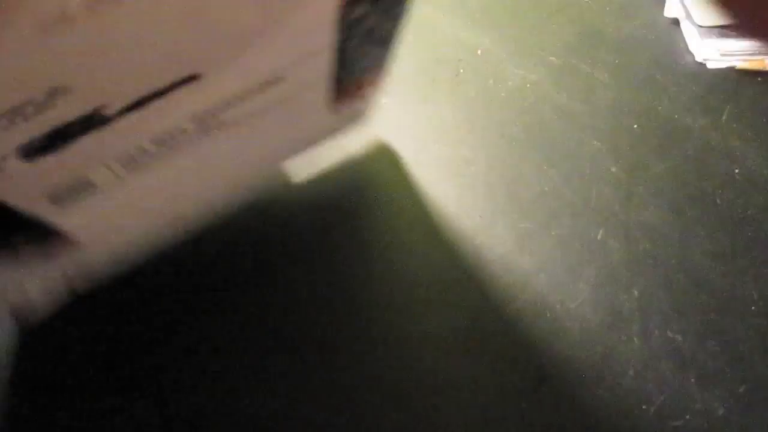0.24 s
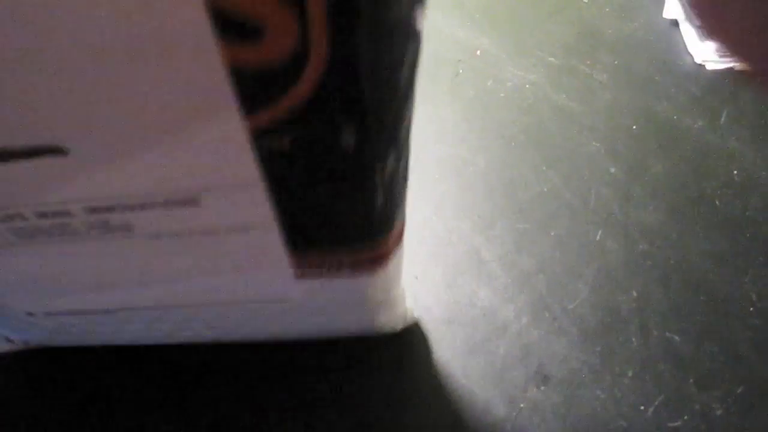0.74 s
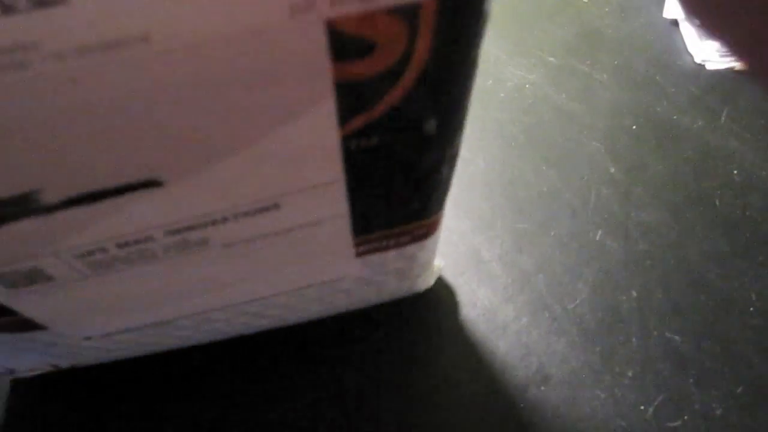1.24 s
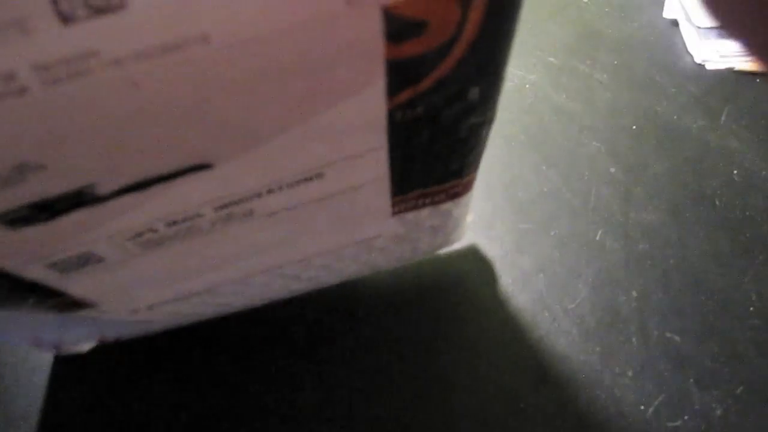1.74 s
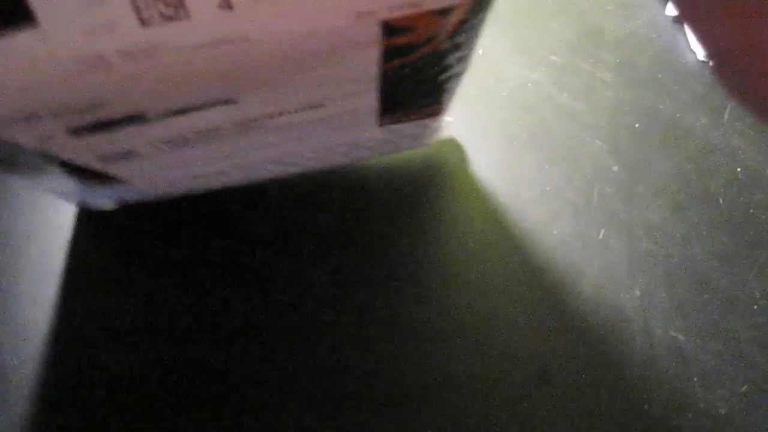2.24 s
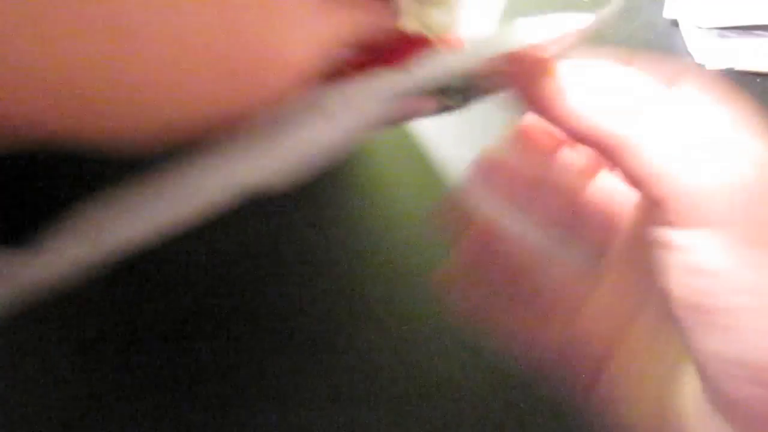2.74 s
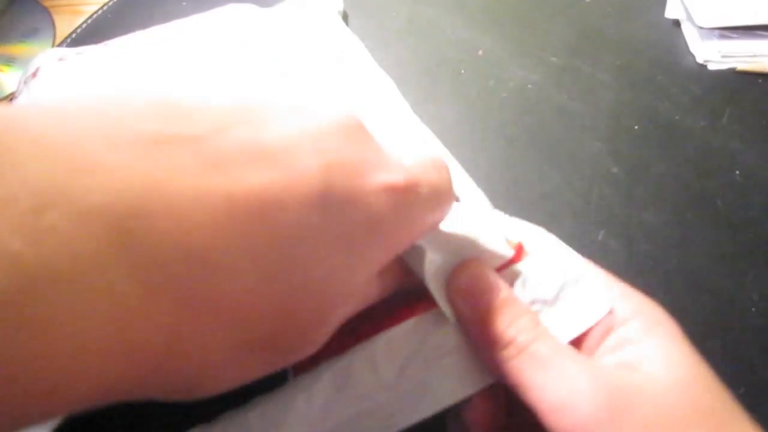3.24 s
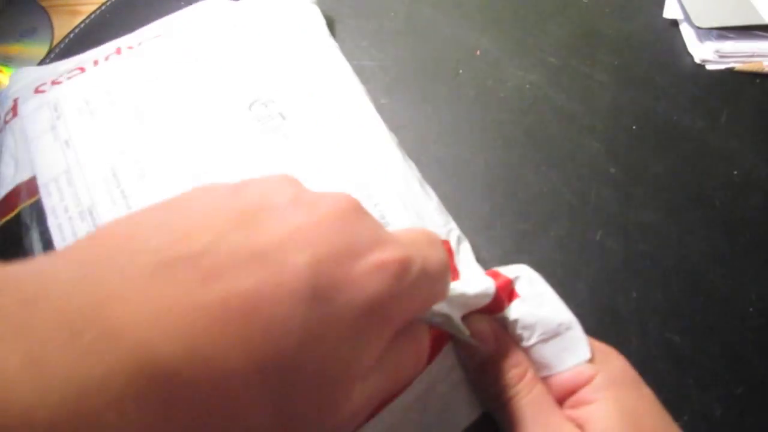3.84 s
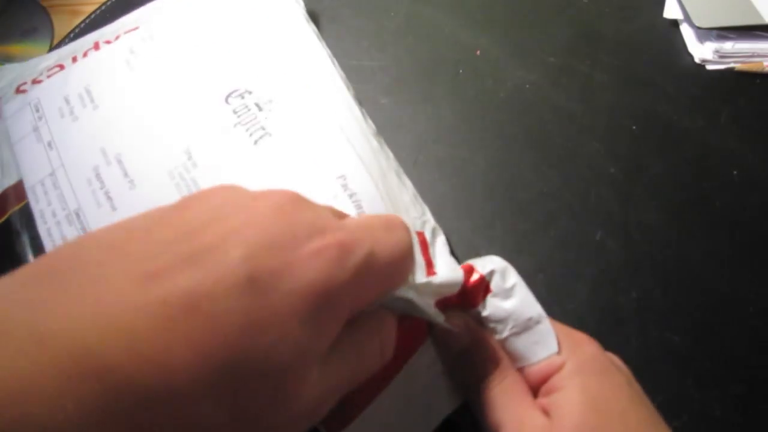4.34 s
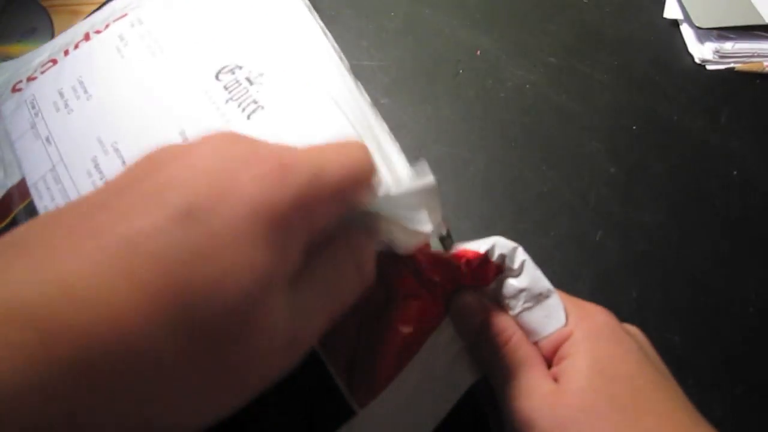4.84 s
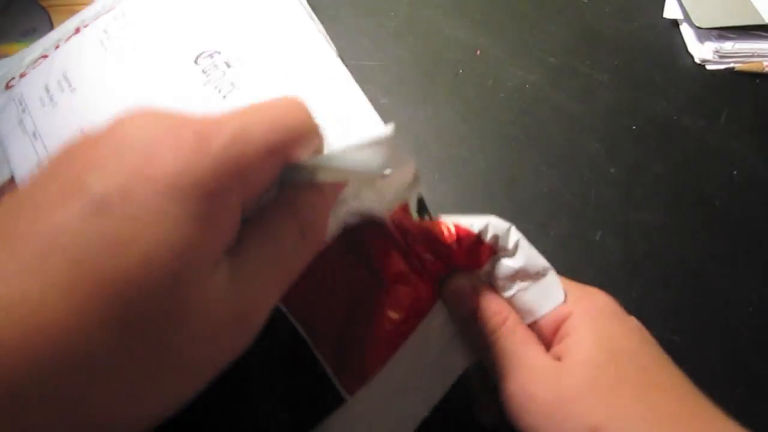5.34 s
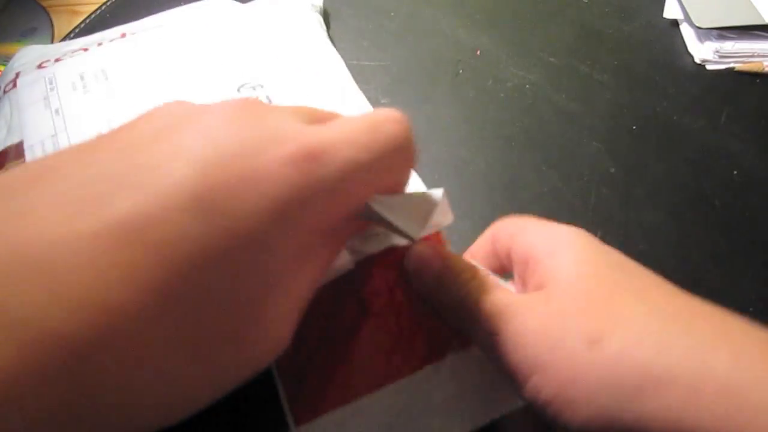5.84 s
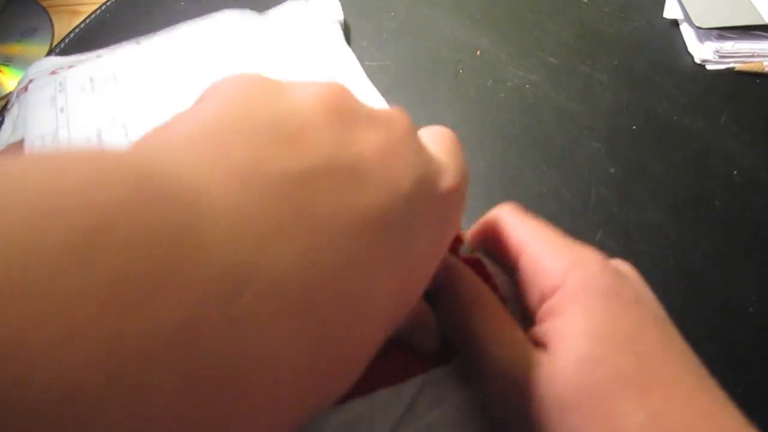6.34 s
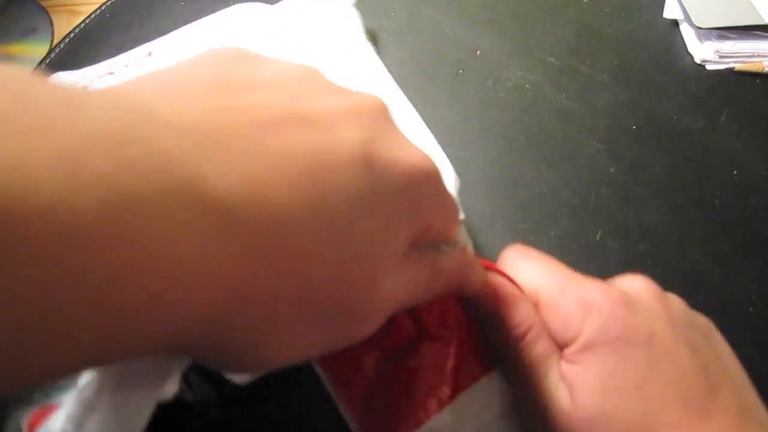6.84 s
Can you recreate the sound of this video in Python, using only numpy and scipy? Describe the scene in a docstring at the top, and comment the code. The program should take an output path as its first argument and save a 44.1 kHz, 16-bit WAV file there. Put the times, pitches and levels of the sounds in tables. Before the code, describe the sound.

Close, dry crackling and rustling of a plastic mailer turned over on a desk, then tugged in short bursts and torn a little.

```python
"""Plastic mailer pulled open by hand

A plastic mailer is picked up from a desk, turned over and pulled open, close up in a small room. Creases snap
as clicked resonances over crinkle (clumped random facet flips) and sliding hiss (coloured noise); taut film
slips in runs of dull plucks and rips in volleys of tiny breaks. Dragged film sings as wavering narrow noise.
Resonances ring the bag faintly, low thumps sit under many of the snaps, and a desk bounce, a short tail and air
noise make the room."""
import sys
import numpy as np
from scipy import signal
from scipy.fft import rfft, irfft
from scipy.io import wavfile
from scipy.ndimage import uniform_filter1d

SR = 44100
rng = np.random.default_rng(int(sys.argv[2]) if len(sys.argv) > 2 else 0)


def inscribe(sig):
    """Save sig as 16-bit PCM at rate SR to the path in sys.argv[1].

    A 1-D sig is mono; a 2-D sig holds one channel per row.
    Samples are clipped to [-1, 1] before scaling.
    """
    pcm = np.round(np.clip(np.atleast_2d(sig).T, -1, 1) * 32767)
    wavfile.write(sys.argv[1], SR, pcm.astype(np.int16))


N = 313551

# Big creases that buckle. Each row: start in seconds, relative level in dB, pitch in Hz, sharpness as Q.
BIG_CREASES = [(0.0955, -21, 3800, 3), (0.1531, -20, 7800, .5), (0.3581, -9, 3300, 1),
               (0.4188, -13, 3500, .5), (0.5156, -13.5, 3500, 1.4), (0.5237, -7, 3500, 4),
               (0.6674, -11, 2600, .7), (0.7092, -10, 3300, 4), (0.7227, -12, 2800, 1.4),
               (0.7327, -15, 600, 1.4), (0.7829, -11, 1100, .5), (0.8155, -15, 2200, 1.4),
               (0.8223, -7, 3500, 1.4), (0.8607, -11, 5800, .5), (0.8881, -13, 5100, .5),
               (0.8963, -11, 3300, .5), (0.9099, -13, 4200, 1), (0.9172, -10, 4000, .7),
               (1.0348, -14, 5400, .7), (1.0667, -14, 1800, 1), (1.121, -12, 7400, .5),
               (1.1373, -13, 3300, 1.4), (1.1723, -12, 2200, .5), (1.1816, -15, 6900, 1.4),
               (1.2384, -12, 2900, 1.4), (1.277, -12, 3500, .7), (1.3068, -15, 7400, .5),
               (1.4344, -16, 7400, .5), (1.4549, -20, 7400, .5), (1.5099, -17, 1600, .5),
               (1.532, -10, 1200, 1), (1.5678, -19, 1800, .7), (1.586, -18, 7400, .5),
               (1.6625, -9, 2300, 1), (1.7265, -18, 6100, 1), (1.7621, -12, 2900, 4),
               (1.8025, -7, 1900, .5), (1.9638, -10, 4200, .7), (1.9712, -9, 2800, 1.4),
               (2.0035, -14, 6100, 1), (2.0136, -15, 3800, 1.4), (2.0373, -15, 3800, .5),
               (2.1672, -17, 5400, .7), (2.2431, -22, 2900, 2), (2.3542, -12, 1000, 1.4),
               (2.4696, -13, 4800, .5), (2.5473, -6, 1600, .5), (2.5516, -12, 4500, 4),
               (2.6368, -13, 1000, 1), (2.7102, -14, 1700, 4), (2.7999, -17, 1700, .7),
               (2.8694, -16, 3500, 2.5), (2.8949, -14, 4500, .7), (2.9235, -14, 2900, 2),
               (3.0347, -11, 5100, 2), (3.0694, -16, 2400, .7), (3.1074, -14, 4500, .5),
               (3.1759, -14, 3000, 2), (3.2463, -14, 3000, 1.4), (3.2641, -17, 2800, 2),
               (3.2981, -17, 2600, 1), (3.3428, -17, 1000, 3), (3.3993, -14, 9400, 4),
               (3.4318, -16, 1200, .5), (3.4418, -16, 900, .5), (3.5781, -17, 3100, 3),
               (3.6763, -19, 2400, 2), (3.7154, -13.5, 1400, .4), (3.7723, -21, 1600, 1),
               (3.8721, -23, 1800, .5), (3.9225, -26, 1500, 1), (4.0492, -25, 1400, 3),
               (4.0544, -25, 7400, 4), (4.1515, -26, 1400, 3), (4.2902, -22, 1700, 1),
               (4.4737, -13, 4000, .7), (4.4976, -18, 1600, .7), (4.5123, -13, 2800, 1),
               (4.6552, -22, 6000, .5), (4.6722, -9, 2600, .5), (4.7079, -16, 2800, .7),
               (4.7498, -12.5, 4000, .7), (4.757, -11, 4200, 3), (4.888, -15, 4500, .5),
               (5.2896, -23, 1300, 1.4), (5.4973, -14, 1600, .7), (5.5447, -18, 2800, .7),
               (5.6699, -21, 1200, 2), (5.788, -24, 1300, 1), (5.8545, -15, 5100, 3),
               (5.8583, -13, 2400, 2), (5.9108, -14, 1500, .5), (5.9763, -14, 5100, .5),
               (6.1953, -18, 2800, .5), (6.2069, -13, 1900, 3), (6.2489, -17, 4200, .7),
               (6.2783, -17, 1000, .5), (6.363, -14, 4800, .5), (6.3863, -16, 800, .5),
               (6.4166, -15, 700, .5), (6.4348, -14, 7800, .5), (6.8427, -21, 1500, .5)]
# Short rips of the film. Each row: start in seconds, length in seconds, relative level in dB, pitch in Hz.
FILM_RIPS = [(1.3608, .002, -14, 3500), (3.029, .008, -22, 4200), (4.9128, .0095, -13.5, 1250),
             (6.8763, .004, -16, 7000), (6.9145, .006, -14.5, 1600), (6.9215, .008, -13, 1200),
             (6.936, .016, -14.5, 1300)]
# Moves of the hands, each a burst of rustle. Each row: start in seconds, length in seconds, relative level at
# mid-move in dB, swell from start to end in dB, body in dB, sheen in dB, sliding hiss in dB (last three: offsets).
HAND_MOVES = [(-0.02, 0.23, -35, 7, -4, -2.5, 9), (0.291, 0.15, -36.5, -23.5, -7, -3.5, -9),
              (0.326, .21, -29.5, 6.5, -6, -1.5, 1.5), (0.558, 0.29, -26, -5, -5, -4.5, 2),
              (0.85, 0.062, -23, -14.5, -4.5, -0.5, 4), (0.97, 0.15, -26.5, 3.5, -5, -2, 3.5),
              (1.156, 0.16, -32.5, -3.5, -2.5, 0, -2.5), (1.366, 0.073, -41, 5, 4, -6, 3),
              (1.466, 0.33, -35, 6, -4.5, 0, -5.5), (1.772, 0.28, -30, 0, -2.5, -6, 6),
              (2.086, 0.052, -30, 2, -6, -4, 5), (2.181, 0.049, -36.5, 3.5, -2.5, -6, 5),
              (2.266, .13, -32.5, 7.5, -11, -5, 9), (2.432, 0.22, -25, 3.5, -4.5, -6, 4),
              (2.659, 0.15, -29, -2, -5, -3, 5.5), (2.836, 0.13, -31.5, 7.5, -2.5, -6, 6),
              (3.004, 0.098, -31, 8.5, -4, -3.5, 9), (3.143, 0.068, -35, 2, -4, 0, 9),
              (3.225, 0.15, -31.5, 4, -2.5, -4.5, 10.5), (3.418, 0.098, -29.5, -2, -3, -4, 6),
              (3.529, 0.28, -36, -3, -3, -3.5, 2), (3.833, 0.16, -42.5, -3, -6, -1.5, 14),
              (4.004, 0.2, -45, -2, -2.5, -2, 8), (4.261, 0.04, -38, -4, -3, -3, 8),
              (4.32, 0.16, -47, -1, -7, 0, 11), (4.446, 0.077, -34, 5, -2.5, -4, 7),
              (4.574, 0.017, -30, -10.5, -4, 0, 8), (4.65, 0.17, -33, 2.5, -4, -1, 10),
              (4.859, 0.15, -30.5, -6, -5.5, -4, 5.5), (5.044, 0.26, -42.5, 0.5, -3, -3.5, 13.5),
              (5.382, 0.16, -36, 12.5, -3, -5, 6), (5.567, 0.024, -36, 1, -5, -3, 21),
              (5.631, 0.069, -37, 7, 1.5, -6.5, 20), (5.794, 0.045, -37.5, 3, 1, -9, 18),
              (5.827, 0.17, -29, -2.5, -2.5, -3.5, 7.5), (6.019, 0.15, -35.5, 8.5, -1, -5.5, 14),
              (6.19, 0.22, -31.5, -9.5, -1.5, -4.5, 13), (6.326, 0.16, -29, 8, 2, -3.5, 19),
              (6.5, 0.11, -31, 5, 2, -5, 16), (6.634, 0.18, -32, -5, 2, -7, 4),
              (6.856, 0.069, -33, 3, 7, 2, 0), (6.911, 0.15, -29, -2.5, -2.5, -5.5, 14)]
# Runs of jerks of the taut film. Each row: start in seconds, length in seconds, first gap in seconds, share by
# which each gap shrinks, first relative level in dB, change per jerk in dB, bite of the upper modes in dB,
# low-pass edge in Hz.
JERK_RUNS = [(1.2929, .07, .0082, 0, -14, -.5, 2, 4200), (1.377, .052, .0053, 0, -35, .4, -12, 1400),
             (6.5025, .102, .0119, 0, -16, .5, -9, 2300), (6.6483, .07, .018, .06, -19.5, 0, -6, 2600),
             (6.7304, .081, .0121, .09, -8, -.8, -13, 2200)]
# Modes of the taut film. Each row: frequency in Hz, relative level in dB, t60 in seconds.
TAUT_FILM_MODES = [(738, -16, .035), (890, -3, .008), (1220, -5, .009), (1600, -7, .006), (2150, -3, .005),
                   (3300, -3, .004)]
# Path of the panel that sings as the bag drags over desk and fingers.
# Each row: time in seconds, relative level in dB, pitch in Hz.
DRAG_PATH = [(2.272, -34, 990), (2.293, -33, 1068), (2.381, -36, 847), (2.429, -69, 1300),
             (2.456, -31, 1500), (2.519, -28.5, 1006), (2.562, -33, 900), (2.636, -30, 899),
             (2.694, -37, 1087), (2.712, -27, 1690), (2.735, -65, 1794)]
# Air and panels of the bag. Each row: frequency in Hz, Q, gain in dB.
BAG_RESONANCES = [(421, 26, -4), (521, 20, -7), (640, 32, -3), (736, 28, -9), (1376, 35, -10)]
# Low thumps, mostly the bass under crease snaps at the same moments. Each row: start in seconds, relative level
# in dB, pitch in Hz, sharpness as Q.
LOW_THUMPS = [(0.153, -20.5, 470, 5.4), (0.197, -15.5, 224, 3), (0.358, -16, 216, 0.55),
              (0.419, -22, 149, 0.75), (0.523, -18, 193, .5), (0.822, -10, 248, 0.14), (1.121, -25, 180, .7),
              (1.293, -16, 250, 1.2), (1.662, -15, 220, 0.17), (2.354, -17.5, 202, 1.1),
              (2.547, -16.5, 170, 0.65), (2.648, -17.5, 229, 4.2), (4.672, -20, 300, 1),
              (4.708, -20, 460, 4.9), (4.913, -26, 248, 0.25), (5.545, -22, 200, .6),
              (6.922, -14, 285, 0.49)]
# Colour of crinkle, sliding film and room air. Each row: frequency in Hz, relative level in dB.
CRINKLE_COLOUR = [(60, -5), (150, 17), (240, 16), (330, 4.5), (500, -6.5), (800, 6), (1250, 10.5),
                  (1800, -8), (3200, 9.5), (5500, 5.5), (8000, 8), (12000, 4), (16000, 6)]
SLIDE_COLOUR = [(60, -16), (150, -22), (300, -6), (500, -5.5), (800, -1.5), (1300, 1.5), (1800, 1),
                (3200, -1), (5500, -2.5), (8000, -8), (12000, -12.5), (16000, -24.5)]
AIR_COLOUR = [(25, -5.5), (70, -5), (150, -7.5), (400, -13), (1500, -10.5), (16000, -70)]

THIN_FILM_HZ, CUTOFF_HZ = 233, 15900
BODY_EDGE_HZ, SHEEN_EDGE_HZ = 1600, 6000
MOVE_ATTACK_S, SETTLE_DB_PER_S, HELD_DB = 0.026, 182, -54


def snaps(table, level_db, chatter, chatter_s, settle, settle_s, top_hz):
    """A click, brief chatter and a fainter, longer settling excite one resonance: a fold or bag giving way."""
    size = 1536
    out, t = np.zeros(N + size), np.arange(size) / SR
    decay = chatter * np.exp(-t / chatter_s) + settle * np.exp(-t / settle_s)
    for (start_s, db, hz, q), noise in zip(table, rng.standard_normal((len(table), size))):
        push = (t == 0) + noise * decay
        snap = cut(resonate(push, hz, q), top_hz, "low", order=1)
        at = int(start_s * SR)
        out[at:at + size] += from_db(db + level_db) * snap / np.linalg.norm(snap)
    return out[:N]


def small_creases(hands, count, over_db, spread_db, pitch_hz, octaves_per_db, octaves, q):
    """Lesser creases, one per equal time slot; level and pitch follow the handling. Rows as in BIG_CREASES."""
    start_s = (np.arange(count) + rng.random(count)) / count * N / SR
    size, pitch, sharpness = rng.standard_normal((count, 3)).clip(-2, 2).T
    hand_db = np.interp(start_s, hands[:, 0], hands[:, 1])
    hz = pitch_hz * 2 ** (octaves * pitch + octaves_per_db * (hand_db - hand_db.mean()))
    return np.column_stack([start_s, hand_db + over_db + spread_db * size, hz, q * 2 ** sharpness])


def rips(level_db, per_s, fizz, q):
    """A tear runs through the film as a tight volley of tiny breaks over a faint fizz."""
    out = np.zeros(N)
    for start_s, length_s, db, hz in FILM_RIPS:
        at, size = int(start_s * SR), int(length_s * SR)
        noise = rng.standard_normal(SR // 10)
        broken = rng.random(SR // 10) < per_s / SR
        breaks = noise * (fizz + broken)
        out[at:at + size] += from_db(db + level_db) * rms_one(resonate(breaks[:size], hz, q))
    return out


def rustle(hands, slide_db, flutter_db, body_db, mid_db, sheen_db):
    """Crinkle and stick-slip hiss: broad loose panels give the body, tight creases the sheen."""
    level_db, body, sheen, sliding_db = in_time(hands)
    hiss = rms_one(colour(rng.standard_normal(N), SLIDE_COLOUR))
    hiss = hiss * from_db(slide_db + sliding_db + flutter_db * drift(133))
    facets = crinkle(level_db, per_s=1300, busier=.4, spread_db=6.5, clump_db=4.5, q=4.2, skirt_q=0.24)
    film = facets + hiss
    low = cut(film, BODY_EDGE_HZ, "low", order=3)
    mid = cut(cut(film, BODY_EDGE_HZ, "high", order=3), SHEEN_EDGE_HZ, "low", order=3)
    high = cut(film, SHEEN_EDGE_HZ, "high", order=3)
    zones = (low, body + body_db), (mid, mid_db), (high, sheen + sheen_db)
    return sum(even(x, window_s=0.069) * from_db(level_db + db) for x, db in zones)


def crinkle(level_db, per_s, busier, spread_db, clump_db, q, skirt_q):
    """Small facets flip in clumps at various pitches, more of them the harder the film is worked."""
    rate = per_s * from_db(busier * (level_db - level_db.mean()) + clump_db * drift(35))
    born = rng.random(N) < rate / SR
    sizes = from_db(spread_db * np.minimum(rng.exponential(1, N), 3.2)) * rng.choice([-1, 1], N)
    pitches_hz = np.geomspace(600, 13000, 22)
    dealt = rng.integers(0, len(pitches_hz), N)
    facets = 0
    for k, hz in enumerate(pitches_hz):
        # a facet radiates only near its own size
        flips = resonate(born * sizes * (dealt == k), hz, skirt_q)
        facets = facets + resonate(flips, hz, q) / np.sqrt(hz)
    return even(colour(facets, CRINKLE_COLOUR), window_s=0.073)


def handling():
    """Each move rises, swells or sags, and settles; the loudest dominates the colour.

    Returns rows of time in seconds, then level, body, sheen and sliding in dB.
    """
    t = np.arange(0, N / SR, .001)
    power, tint = from_db(HELD_DB) ** 2 + 0 * t, 0
    for start_s, length_s, db, swell_db, *colours_db in HAND_MOVES:
        rise = np.clip((t - start_s) / MOVE_ATTACK_S, 0, 1)
        hold_db = db + swell_db * (np.clip((t - start_s) / length_s, 0, 1) - .5)
        settle_db = SETTLE_DB_PER_S * np.maximum(t - start_s - length_s, 0)
        move = (rise * from_db(hold_db - settle_db)) ** 2
        power, tint = power + move, tint + np.outer(colours_db, move)
    return np.column_stack([t, 10 * np.log10(power), *(tint / power)])


def slips(level_db, low_hz, jitter_s, uneven_db, catch_s, catch_db):
    """Each jerk plucks the stretched film like a small slack drum, and catches once more before it rests."""
    out, k = 0, np.arange(16)
    for start_s, length_s, gap_s, shrink, db, step_db, bite_db, soft_hz in JERK_RUNS:
        gaps_s = gap_s * (1 - shrink) ** k
        after_s = np.cumsum(gaps_s) - gaps_s
        late, strong = rng.standard_normal((2, len(k)))
        jerk_s = start_s + after_s + jitter_s * late
        jerk_db = db + step_db * k + uneven_db * strong
        jerks = np.column_stack([jerk_s, jerk_db, np.full(len(k), bite_db)])
        delay_s = catch_s * rng.uniform(0.68, 1.84, len(k))
        catches = jerks + [0, catch_db, 0] + np.outer(delay_s, [1, 0, 0])
        inside = after_s < length_s
        plucks = strike(np.vstack([jerks[inside], catches[inside]]), TAUT_FILM_MODES, vary_db=-1)
        out = out + cut(plucks, soft_hz, "low", order=3)
    return from_db(level_db) * cut(out, low_hz, "high", order=2)


def strike(events, modes, vary_db):
    """Each event rings every mode with its own strength; bite sets the level of the upper modes."""
    upper_hz = 1800
    start_s, db, bite_db = np.transpose(events)
    out, chance = np.zeros(N), rng.standard_normal((len(start_s), len(modes)))
    for k, (hz, mode_db, t60_s) in enumerate(modes):
        clicks = np.zeros(N)
        click_db = db + mode_db + bite_db * (hz > upper_hz) + vary_db * chance[:, k]
        clicks[(start_s * SR).astype(int)] = from_db(click_db)
        r, w = from_db(-60 / (t60_s * SR)), 2 * np.pi * hz / SR  # pole radius and angle
        out += signal.lfilter([1, -r * np.cos(w)], [1, -2 * r * np.cos(w), r * r], clicks + 1e-18)
    return out


def drag(level_db, width_hz):
    """Friction feeds one panel resonance, whose pitch follows the film tension: noise on a gliding carrier."""
    path_db, hz = in_time(DRAG_PATH)
    wobble = drift(width_hz) + 1j * drift(width_hz)
    ends_s = [DRAG_PATH[0][0], DRAG_PATH[-1][0]]
    gate = np.interp(np.arange(N) / SR, ends_s, [1, 1], left=0, right=0)
    carrier = np.exp(2j * np.pi * np.cumsum(hz) / SR)
    return gate * from_db(path_db + level_db) * np.real(wobble * carrier)


def bag_ring(film):
    """Air and panels of the bag resonate with the film sounds."""
    return sum(from_db(db) * resonate(film, hz, q) for hz, q, db in BAG_RESONANCES)


def room(x, desk_s, desk_db, wet_db, t60_s, wall_hz):
    """One bounce off the desk, plus a short diffuse tail."""
    t = np.arange(SR // 2) / SR
    tail = rng.standard_normal(len(t)) * from_db(-60 * t / t60_s) * (t > .003)
    tail = cut(tail, wall_hz, "low", order=1)
    echo = from_db(wet_db) * tail / np.linalg.norm(tail)
    echo[int(desk_s * SR)] += from_db(desk_db)
    return x + signal.fftconvolve(x, echo)[:N]


def room_air(level_db):
    """Steady coloured noise of the room air."""
    return from_db(level_db) * rms_one(colour(rng.standard_normal(N), AIR_COLOUR))


def from_db(db):
    """Decibels to gain."""
    return 10 ** (np.asarray(db) / 20)


def rms_one(x):
    """Scale to unit rms."""
    return x / np.sqrt(np.mean(x ** 2) + 1e-20)


def even(x, window_s):
    """Hold the running level at 1, leaving the fine grain."""
    return x / np.sqrt(np.abs(uniform_filter1d(x * x, int(window_s * SR))) + 1e-9)


def in_time(rows):
    """Each column of a curve table, sample by sample."""
    time_s, *columns = np.transpose(rows)
    return [np.interp(np.arange(N) / SR, time_s, c) for c in columns]


def drift(cutoff_hz):
    """Low-passed noise with unit rms, after a second of run-in."""
    return rms_one(cut(rng.standard_normal(N + SR), cutoff_hz, "low", order=2)[SR:])


def cut(x, hz, kind, order):
    """Butterworth filter."""
    sos = signal.butter(order, np.minimum(hz, .45 * SR), kind, fs=SR, output="sos")
    return signal.sosfilt(sos, x + 1e-18)


def resonate(x, hz, q):
    """One resonance with unit peak gain; pitch is capped and Q floored."""
    hz = min(hz, SR / np.pi)
    return signal.lfilter(*signal.iirpeak(hz, max(q, np.e * hz / SR), fs=SR), x + 1e-18)


def colour(x, spectrum):
    """Causal (minimum-phase) filter that follows a spectrum table."""
    size = 4096
    hz, db = np.transpose(spectrum)
    grid_hz = np.linspace(1, SR / 2, size // 2 + 1)
    gain = from_db(np.interp(np.log(grid_hz), np.log(hz), db))
    cepstrum = irfft(np.log(gain))
    # folding the cepstrum gives minimum phase
    cepstrum[1:size // 2] *= 2
    cepstrum[size // 2 + 1:] = 0
    return signal.fftconvolve(x, irfft(np.exp(rfft(cepstrum))))[:N]


def scene():
    """Film sounds ring the bag and spread into the room."""
    hands = handling()
    lesser = small_creases(hands, count=130, over_db=9, spread_db=3.5, pitch_hz=3120,
                           octaves_per_db=-0.02, octaves=0.87, q=2.4)
    creases = np.vstack([BIG_CREASES, lesser])
    cracks = snaps(creases, level_db=17, chatter=.29, chatter_s=.0006, settle=.04, settle_s=0.0035, top_hz=13500)
    cracks = cracks + rips(level_db=-1, per_s=2500, fizz=0.062, q=0.31)
    # small patches of film radiate little bass
    film = cut(cracks, THIN_FILM_HZ, "high", order=2)
    film = film + rustle(hands, slide_db=-4.5, flutter_db=3.0, body_db=-1.5, mid_db=0.88, sheen_db=1.1)
    film = film + slips(level_db=4.5, low_hz=470, jitter_s=.0002, uneven_db=1.2, catch_s=.0011, catch_db=-7)
    film = film + drag(level_db=-0.5, width_hz=190)
    bumps = snaps(LOW_THUMPS, level_db=10.0, chatter=.014, chatter_s=0.0037, settle=0.011, settle_s=0.03, top_hz=600)
    air = room_air(level_db=-57.5)
    near = film + bag_ring(film) + bumps
    return (room(near, desk_s=.0022, desk_db=-32.5, wet_db=-17.5, t60_s=0.21, wall_hz=7100) + air)[None]


def record(dry):
    """The tallest peaks are rounded off and the top is cut."""
    ceiling = .68
    top_cut = signal.ellip(10, .1, 80, CUTOFF_HZ, fs=SR, output="sos")
    held = dry / (1 + (dry / ceiling) ** 4) ** (1 / 4)
    return signal.sosfiltfilt(top_cut, held)


dry = scene()
out = record(dry)
inscribe(out)
```